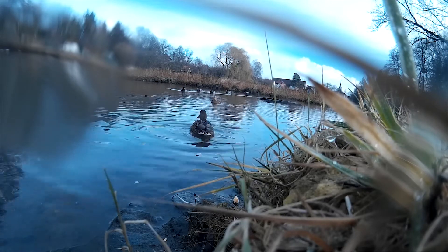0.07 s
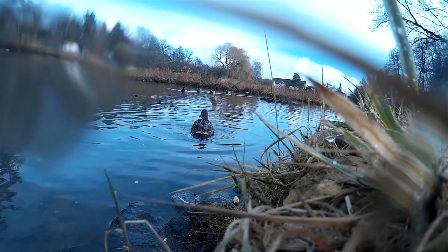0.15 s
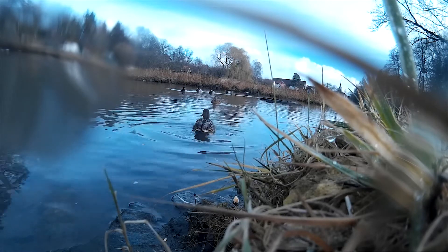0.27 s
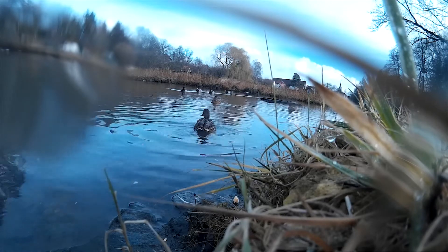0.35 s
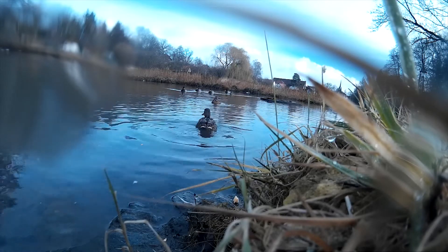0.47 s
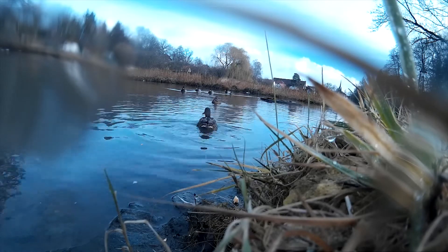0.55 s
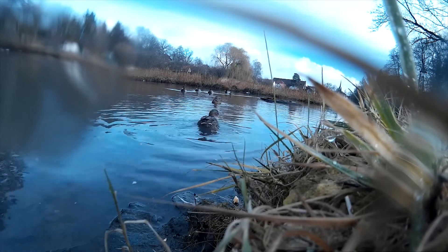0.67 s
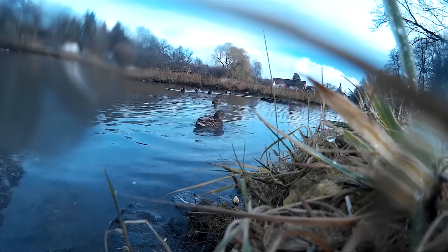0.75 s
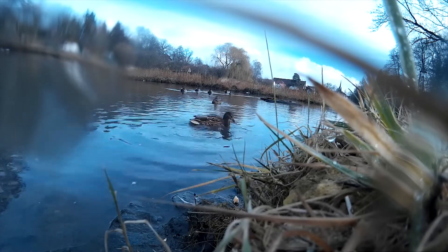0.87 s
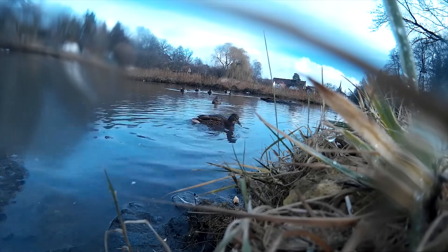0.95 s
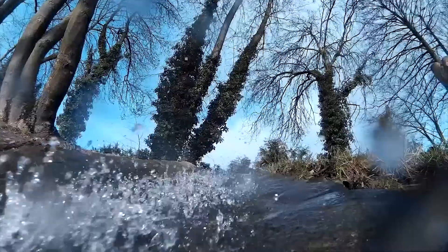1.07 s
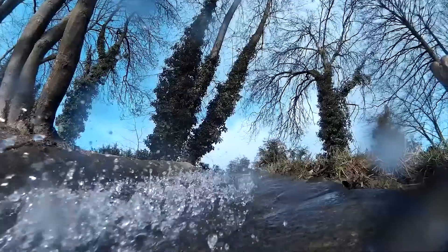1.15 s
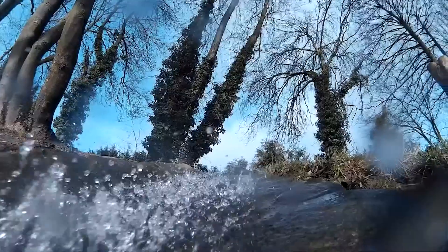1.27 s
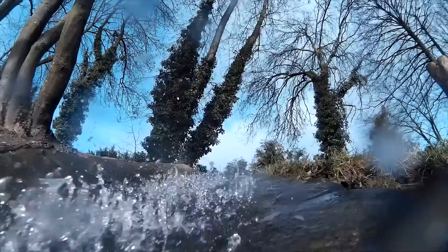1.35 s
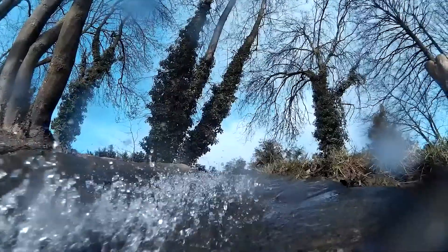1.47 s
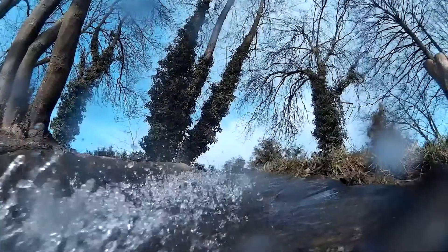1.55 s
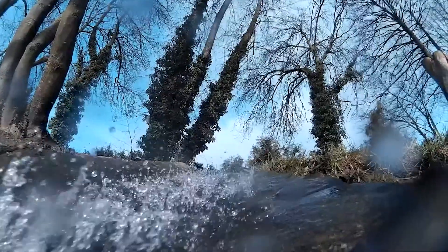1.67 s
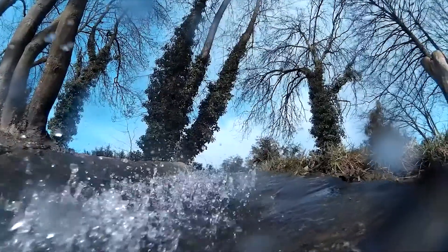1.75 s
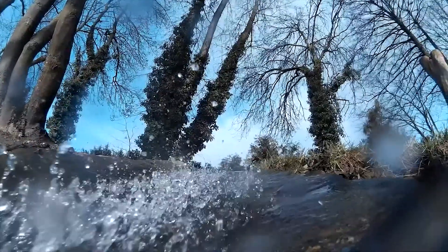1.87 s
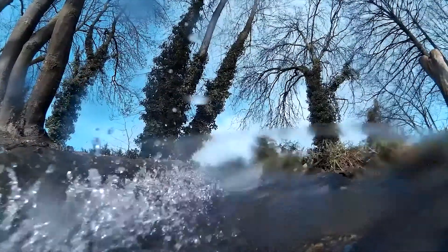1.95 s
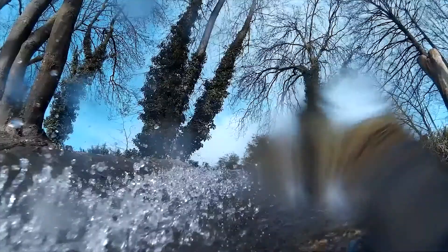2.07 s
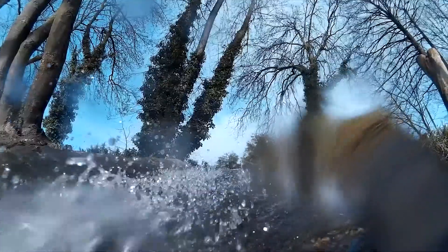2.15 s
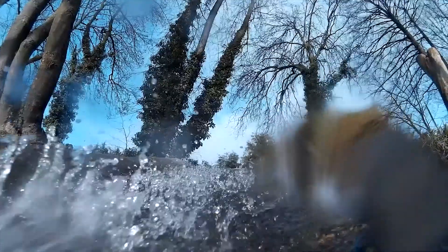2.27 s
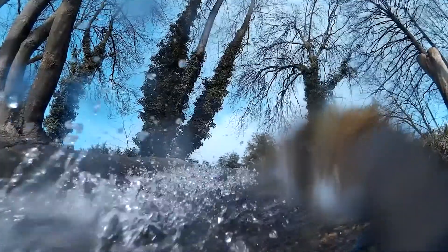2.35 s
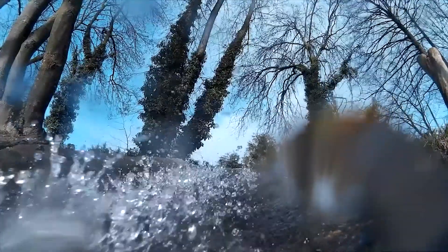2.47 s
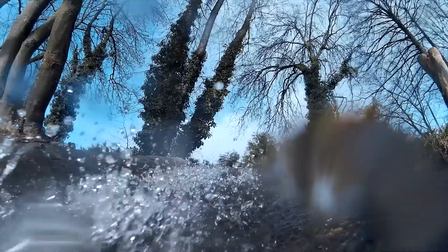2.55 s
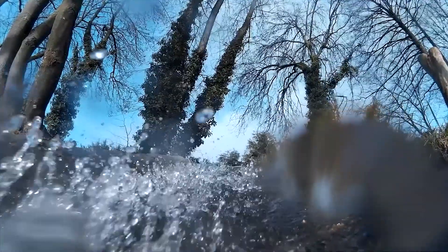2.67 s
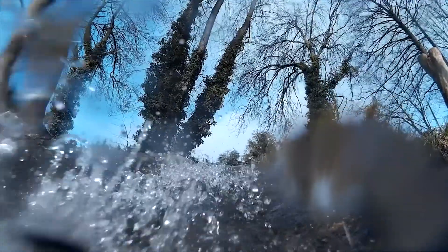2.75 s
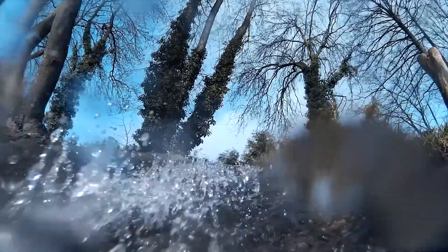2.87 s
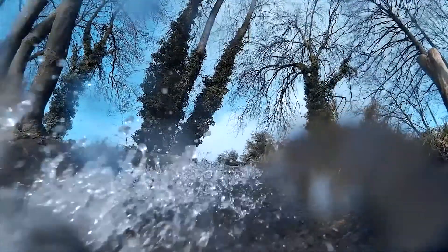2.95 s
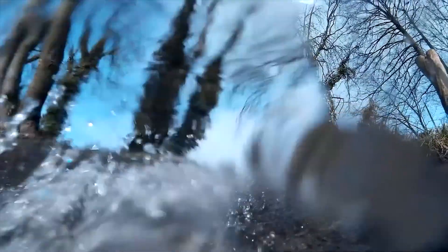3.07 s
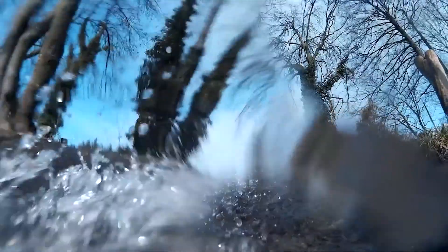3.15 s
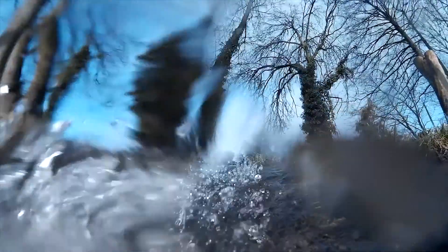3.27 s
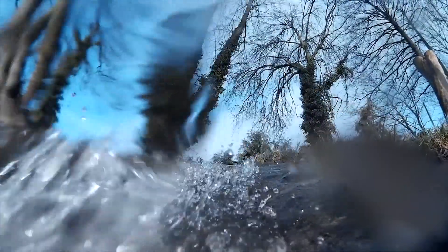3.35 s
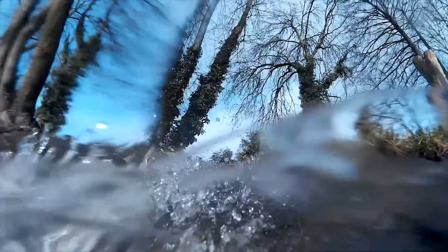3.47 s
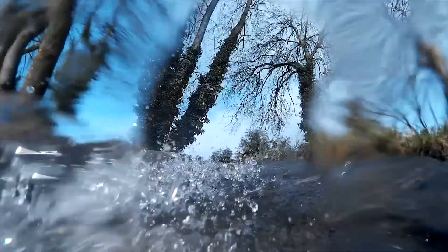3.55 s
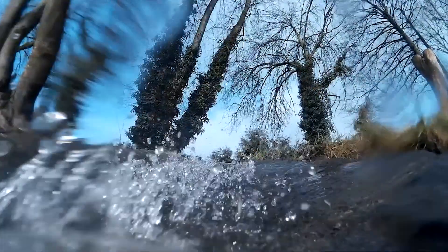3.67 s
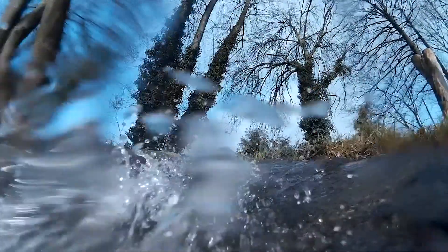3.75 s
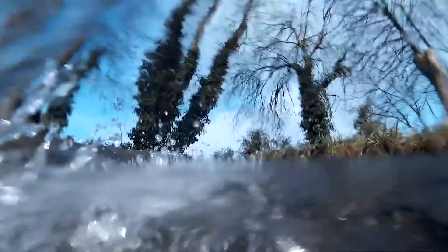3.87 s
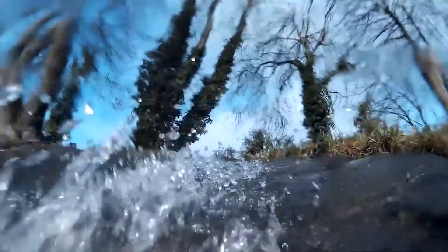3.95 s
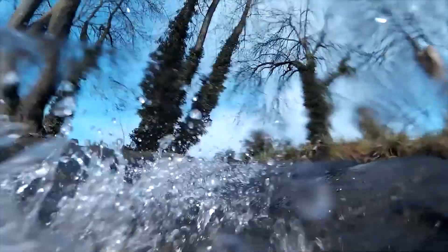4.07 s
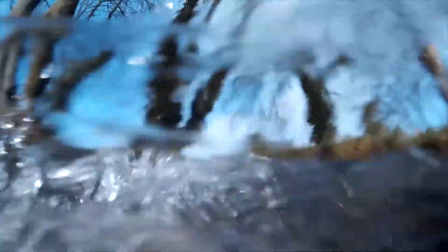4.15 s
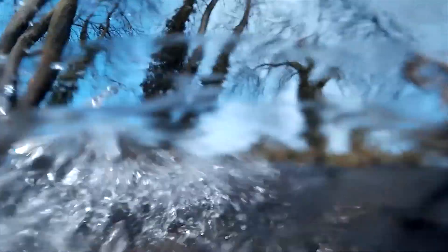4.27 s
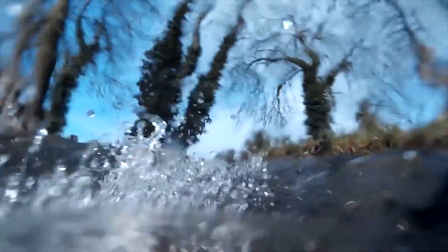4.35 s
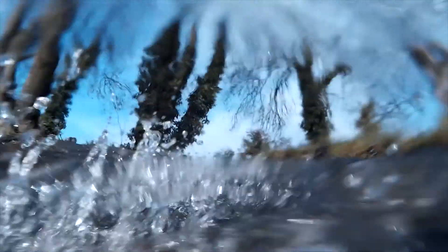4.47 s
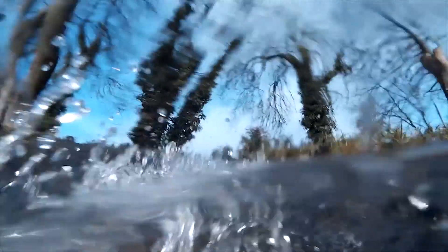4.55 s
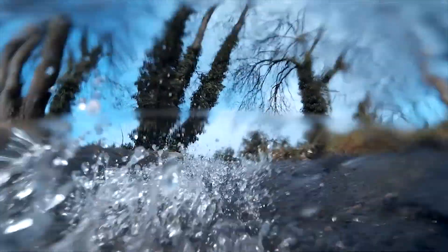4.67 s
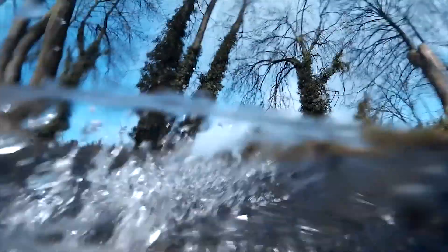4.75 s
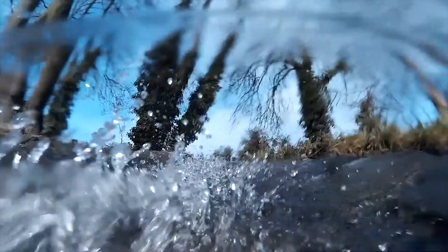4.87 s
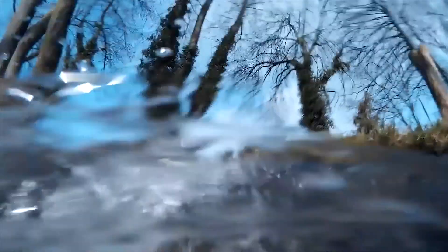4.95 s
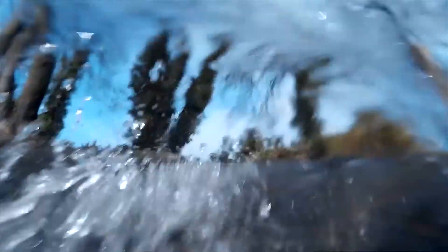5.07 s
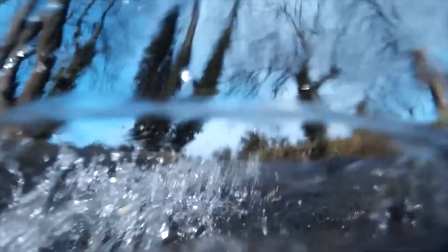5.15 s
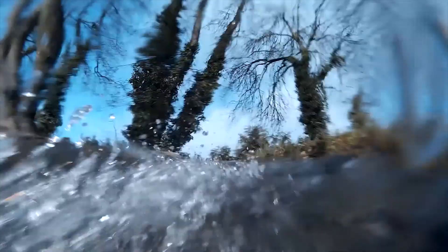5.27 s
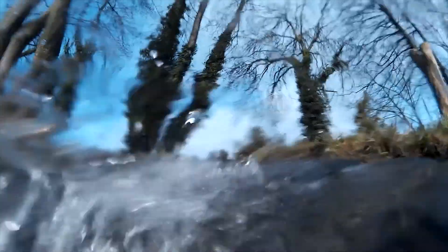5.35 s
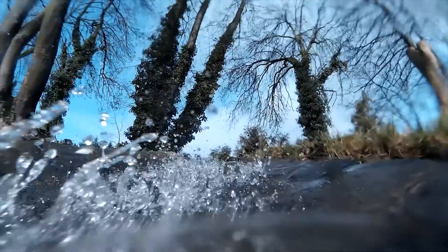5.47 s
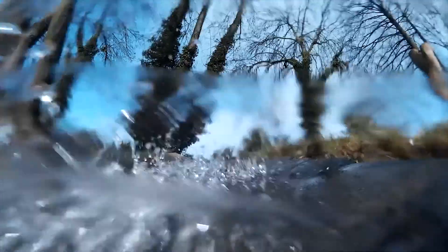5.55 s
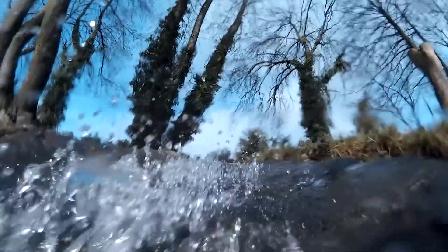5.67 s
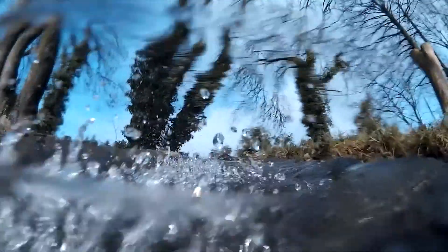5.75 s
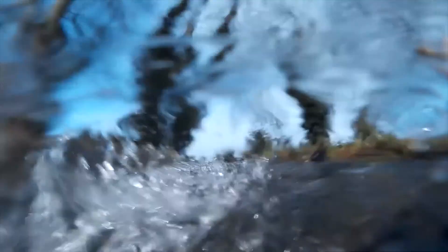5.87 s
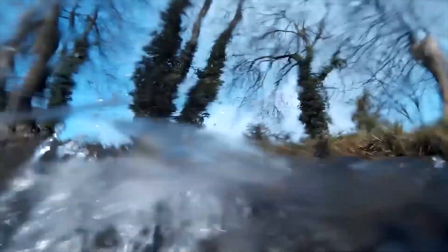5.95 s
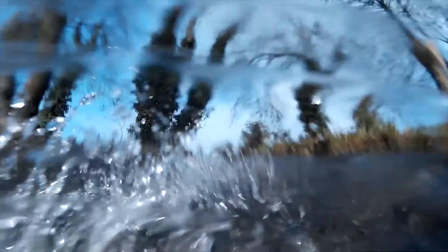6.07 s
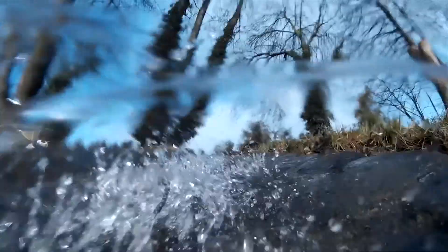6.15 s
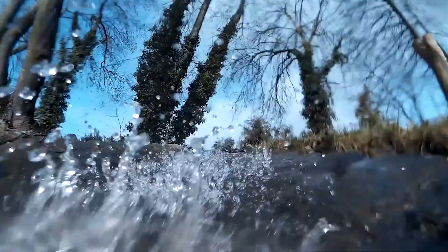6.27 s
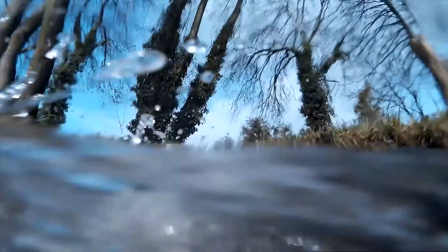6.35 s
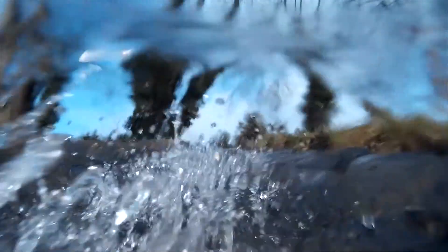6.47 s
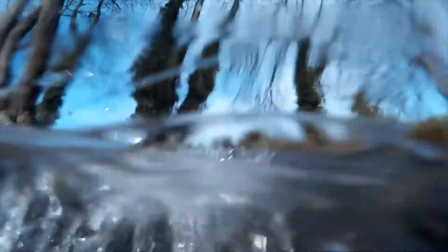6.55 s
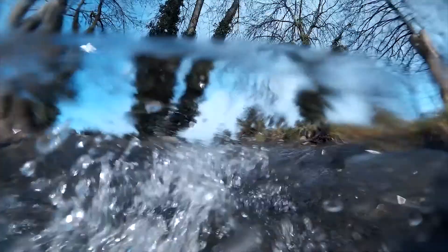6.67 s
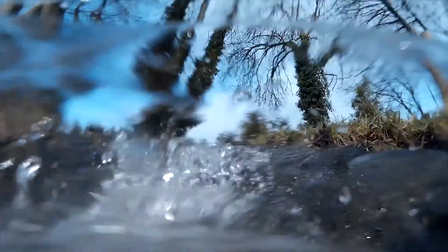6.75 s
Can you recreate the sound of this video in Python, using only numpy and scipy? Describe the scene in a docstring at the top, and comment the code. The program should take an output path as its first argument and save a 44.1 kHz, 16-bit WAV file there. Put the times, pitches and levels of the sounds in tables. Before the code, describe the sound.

From 0 to 1.05 seconds there is only very faint, steady microphone hiss. Then water enters quietly: fine random drops, foam fizz and a few weak taps on a sealed case. A clear slap lands at about 1.9, smaller ones at 2.1 and 2.45. From 2.65 the blows grow, and between 2.9 and 3.5 they crowd together, hollow and knocking, with pitched bubble plops. From 3.5 to 4.6 the churn is dense and loud, gurgling and splattering directly on the case. It eases a little around 5.2 to 5.6, though hard slaps continue at 5.08, 5.48, 5.72, 5.94 and 6.0. More slaps and plops follow, with a strong bubbly plop near 6.8, cut off as splashing continues. The sound is close, dry and boxy, with a short mid-range ring, muted treble, slight high grain and flattened peaks.

```python
"""Pond water on a sealed camera case

After a second of faint hiss, water churns: random drops with foam bubbles, gurgles and grain near 8 kHz.
Slaps are noise bursts, plops are splashes with a sine bubble; the churn swells and ebbs on its own course.
Drops, foam and blows excite the boxy ring of the case; the hardest hits are flattened by the microphone."""
import sys
import numpy as np
from scipy import signal
from scipy.fft import rfft, irfft
from scipy.io import wavfile
from scipy.ndimage import uniform_filter1d

SR = 44100
rng = np.random.default_rng(int(sys.argv[2]) if len(sys.argv) > 2 else 0)


def master(y):
    """Save y as 16-bit WAV."""
    cut = np.clip(np.atleast_2d(y).T, -1, 1)
    pcm = np.round(cut * 32767)  # scale
    wavfile.write(sys.argv[1], SR, pcm.astype(np.int16))


N = 300275
TIME = np.arange(N) / SR
WATER_START_S = 1.053


def undb(db):
    """Decibels to gain."""
    return 10 ** (np.asarray(db) / 20)


def unit(x):
    """Scale to rms 1."""
    return x / np.sqrt(np.mean(x ** 2) + 1e-20)


def spectrum_db(points, hz):
    """Join (Hz, dB) points on a log-frequency axis."""
    point_hz, point_db = np.transpose(points)
    return np.interp(np.log(hz + 1), np.log(point_hz), point_db)


def band(x, lo_hz, hi_hz):
    """Causal band-pass."""
    sos = signal.butter(N=3, Wn=[lo_hz, hi_hz], btype="band", fs=SR, output="sos")
    return signal.sosfilt(sos, x)


def lowpass(x, hz):
    """Steep elliptic cut of the top."""
    sos = signal.ellip(10, 0.2, 75, hz, fs=SR, output="sos")
    return signal.sosfilt(sos, x)


def add(track, start_s, sound):
    """Mix a sound in at a time, cut at the end of the track."""
    i = int(start_s * SR)
    part = sound[:max(len(track) - i, 0)]
    track[i:i + len(part)] += part


def walk(rate_hz):
    """Smooth random wander of rms 1."""
    hold = int(SR / rate_hz)
    steps = np.repeat(rng.standard_normal(N // hold + 1), hold)
    return unit(uniform_filter1d(steps, hold)[:N])


# Each row: frequency in Hz, noise density in dB re an arbitrary level.
HISS_SPECTRUM = [(20, -4), (85, -8), (165, -11), (300, -15), (1200, -22.5), (5000, -27.5), (15000, -27.5)]


def hiss(level_db=-68.5):
    """Microphone self-noise: steady shaped noise, present only before the water begins."""
    hz = np.arange(N // 2 + 1) * SR / N
    spectrum = rfft(rng.standard_normal(N)) * undb(spectrum_db(HISS_SPECTRUM, hz))
    noise = irfft(spectrum, N)
    return unit(noise) * undb(level_db) * (TIME < WATER_START_S)


# Broad response of the sealed case. Each row: frequency in Hz, gain in dB.
CASE_RESPONSE = [(25, -4), (140, -3.5), (220, 4), (350, 4), (560, -4), (1030, -7.5), (1650, -5), (2200, 1),
                 (2500, -11.5), (3150, -12.5), (3800, -4), (5500, -13.5), (6700, -31), (8200, -35.5)]
BOX_HZ, TOP_EDGE_HZ = 776, 7950
# Case resonances, then a narrow peak at the recorder's upper band edge.
# Each row: centre in Hz, width in Hz, lift in dB.
RESPONSE_PEAKS = [(BOX_HZ, 58, 26.7), (1330, 280, 9.36), (1825, 77, 8.3), (2695, 180, 9.6),
                  (5400, 140, 0.97), (5900, 89, 0.96), (TOP_EDGE_HZ, 210, 13.8)]


def case_ring(size=4096):
    """One tap on the case as recorded: a minimum-phase (causal) response whose peaks ring briefly."""
    hz = np.arange(size // 2 + 1) * SR / size
    gain = undb(spectrum_db(CASE_RESPONSE, hz))
    for centre_hz, width_hz, lift_db in RESPONSE_PEAKS:
        detuning = 2 * (hz - centre_hz) / width_hz
        gain = gain * np.sqrt(1 + (undb(lift_db) ** 2 - 1) / (1 + detuning ** 2))
    # fold the cepstrum to make the response causal
    cepstrum = irfft(np.log(gain))
    cepstrum[1:size // 2] *= 2
    cepstrum[size // 2 + 1:] = 0
    return irfft(np.exp(rfft(cepstrum)))


def drops(rate_hz, scatter_db, biggest):
    """Random taps of either sign: many small ones, a few large."""
    size = undb(scatter_db * np.minimum(rng.exponential(size=N), biggest))
    lands = rng.random(N) < rate_hz / SR
    return unit(lands * size * rng.choice([-1, 1], N))


def bubble(hz, t60_s, attack_s=0.00034):
    """A trapped air pocket: a sine decaying 60 dB, rising slightly in pitch as it nears the surface."""
    t = TIME[:int(max(t60_s, 0.002) * SR)]
    age = t / t[-1]
    phase = 2 * np.pi * hz * t * (1 + 0.03 * age)
    attack = 1 - np.exp(-t / attack_s)
    return np.sin(phase) * np.exp(-np.log(1000) * age) * attack


def fizz(count, low_hz, high_hz, longest_t60_s, scatter_db, biggest, small_db):
    """Bubbles of random size and time; small ones are higher, die sooner and gain up to small_db."""
    out = np.zeros(N)
    for when, small, chance in rng.random((count, 3)):
        hz = low_hz * (high_hz / low_hz) ** small
        db = scatter_db * min(-np.log(chance), biggest) + small_db * small
        t60_s = longest_t60_s * np.sqrt(low_hz / hz)
        add(out, when * N / SR, undb(db) * bubble(hz, t60_s))
    return unit(out)


def gurgle(level_db, gurgle_db=-10):
    """Larger, lower bubbles ring out of the churn."""
    bubbles = fizz(count=420, low_hz=1050, high_hz=2700, longest_t60_s=0.024,
                   scatter_db=5, biggest=2.2, small_db=0)
    return bubbles * undb(level_db + gurgle_db)


def top_edge_grain(level_db, wash, far_db=-31, close_db=-24):
    """Narrow, grainy band near 8 kHz at the recorder's upper limit: filtered ticks, rising with the churn."""
    ticks = drops(rate_hz=160, scatter_db=6, biggest=2.8)
    grain = unit(band(ticks, 7600, 8350))
    return grain * undb(level_db + far_db + wash * (close_db - far_db))


# Edges in Hz of five ranges: thud, knock, clack, spray and snap.
RANGE_EDGES_HZ = [20, 570, 1050, 2800, 6300, 10000]
# How hard the water churns. Each row: time in seconds, relative level in dB.
CHURN_LEVEL = [(1.07, -60), (1.63, -59), (1.79, -53.5), (2.19, -56.5), (2.43, -50), (2.59, -52.5),
               (2.99, -48.5), (4.11, -39), (4.43, -43), (4.51, -35.5), (4.67, -39.5), (4.91, -39.5),
               (5.15, -46.5), (5.47, -47), (5.63, -51.5), (5.71, -42.5), (6.11, -46.5), (6.8, -42.5)]
# One row per range: offset in dB out on the pond, offset in dB when washing over the case.
CHURN_OFFSETS = [(-10, -7.5), (4, 0.5), (-3, -6), (-11.5, -13.5), (-20, -23.5)]
# Churn levels at which water starts to run over the case and fully covers it.
WASH_BEGINS_DB, WASH_COVERS_DB = -54, -44.5


def churn(ring, near_db=3, splatter=0.19, splatter_decay_s=0.0014):
    """Fine patter and foam nearby, joined by coarser splattering drops on the case, ring the case."""
    level_db = np.interp(TIME, *np.transpose(CHURN_LEVEL))
    wash = np.clip((level_db - WASH_BEGINS_DB) / (WASH_COVERS_DB - WASH_BEGINS_DB), 0, 1)
    far = drops(rate_hz=1100, scatter_db=4.5, biggest=2.6)
    taps = drops(rate_hz=340, scatter_db=5.5, biggest=2.4)
    # each near drop bursts into a brief splatter
    decay = np.exp(-1 / (splatter_decay_s * SR))
    burst = signal.lfilter([1], [1, -decay], np.abs(taps))
    near = unit(taps + splatter * burst * rng.standard_normal(N))
    foam = fizz(count=4200, low_hz=1100, high_hz=7500, longest_t60_s=0.015,
                scatter_db=5, biggest=3, small_db=15)
    force = far * (1 - 0.5 * wash)
    force = force + wash * undb(near_db) * near
    force = force + (0.4 + 0.45 * wash) * foam
    # the water arrives in clumps
    force = force * undb((1.6 + 1.3 * wash) * walk(rate_hz=90))
    sound = signal.fftconvolve(force, ring)[:N]
    patter = np.zeros(N)
    for lo_hz, hi_hz, (far_db, close_db) in zip(RANGE_EDGES_HZ, RANGE_EDGES_HZ[1:], CHURN_OFFSETS):
        range_db = level_db + far_db + wash * (close_db - far_db)
        patter += unit(band(sound, lo_hz, hi_hz)) * undb(range_db)
    return (patter + gurgle(level_db) + top_edge_grain(level_db, wash)) * (TIME > WATER_START_S)


def pressed(db, hard_db=-32, push=0.77):
    """Blows above hard_db land squarely on the microphone wall and gain push dB per dB."""
    return db + push * max(db - hard_db, 0)


# Knock, clack, spray and snap of an average blow. Each row: centre in Hz, relative level in dB.
AVERAGE_BLOW = [(775, -6.5), (1700, -4.5), (4000, -12.5), (7500, -19.5)]
PIVOT_HZ = 1620


def colour(brightness_db_per_octave, thud_db):
    """Relative dB of thud, knock, clack, spray and snap; brightness tilts the last four about a pivot."""
    hz, db = np.transpose(AVERAGE_BLOW)
    return np.r_[thud_db, db + brightness_db_per_octave * np.log2(hz / PIVOT_HZ)]


def impact(rings, bands_db, early_s=0.004):
    """Leading drops, a blow and the splatter after it ring the case, with a separate level per range."""
    count, size = rings.shape
    t = TIME[:size] - early_s
    before = 0.096 * np.exp(-np.abs(t) / 0.0015)
    # a gentle lump dribbles on, a hard one bursts all at once
    dribble = 0.024 / (1 + undb(max(bands_db) + 43) ** 2)
    after = 0.21 * np.exp(-np.abs(t) / 0.0021) + dribble * np.exp(-np.abs(t) / 0.015)
    # large and small droplets land in separate bunches just under a millisecond long
    bunch_db = 5 * np.repeat(rng.uniform(-1.7, 1.7, (count, size // 32)), 32, axis=1)
    envelope = undb(bunch_db) * np.where(t < 0, before, after)
    force = rng.standard_normal((count, size)) * envelope
    force[:, np.argmin(np.abs(t))] += 1  # the blow
    parts = signal.fftconvolve(rings, force, axes=1)[:, :size]
    return sum(undb(db) * unit(part) for part, db in zip(parts, bands_db))


def shove(db, length_s=0.0048):
    """A heavy lump flexes the wall in and out once: one windowed sine cycle."""
    t = TIME[:int(length_s * SR)]
    return undb(db) * np.sin(2 * np.pi * t / t[-1]) * np.hanning(len(t))


# Cycles to a 60 dB decay, for the bubbles of slaps and plops.
BUBBLE_CYCLES = 31.3
# Lumps of water slapping the case. Each row: time in seconds, relative level in dB,
# brightness in dB per octave, thud in dB relative to the level.
SLAP_EVENTS = [(1.0816, -51.5, -11, -3), (1.1584, -48.0, -2.5, -14), (1.3513, -53.5, 0, -6),
               (1.5391, -56, 1, -1), (1.8885, -33.5, -2, -12.5), (1.895, -41.5, -1, -10),
               (2.1032, -42.5, -2, -15), (2.1951, -51.5, 0, -1.5), (2.3516, -55, 3.5, 3.5),
               (2.4612, -39, 1.5, -12.0), (2.5331, -46, 2.0, -1), (2.651, -33, 0.5, -8),
               (2.7746, -41.5, -6, -10.0), (2.7999, -36.5, -2, -5), (2.9267, -40.0, -6.5, -8),
               (2.9411, -31.5, 3.5, -11.0), (2.9696, -29.5, 1.5, -7.5), (2.9757, -28.5, -3.5, -17.5),
               (2.991, -34.5, -1, -9), (3.0473, -38.5, 3, -5), (3.063, -35.5, 2, -9),
               (3.0835, -31.5, -6.5, -19), (3.1495, -35, -8.5, -7.5), (3.1878, -37.0, 1.0, -13),
               (3.2015, -33.5, -2.5, -15), (3.2074, -30.5, 3.5, -16), (3.241, -37.0, 0.0, -24),
               (3.2968, -29.5, -1, -15), (3.3487, -27.5, 3.5, -15), (3.3944, -38, 1, -8),
               (3.4109, -26, -6.5, -5), (3.436, -42, 6, -19), (3.4503, -33.5, 1, -16),
               (3.5415, -31, 1.5, -8), (3.5663, -32, -6.5, -16.0), (3.5956, -27.5, -3.0, -13.5),
               (3.6829, -27.5, 1.5, -17), (3.7359, -23.5, 1, -22), (3.785, -31, 2.0, -14.5),
               (3.876, -32.5, -1.0, -16), (3.9528, -30.5, 4.5, -17), (4.0038, -31, 0.5, -18.5),
               (4.0544, -31.5, 1, -11.5), (4.0998, -31.5, -1, -12.5), (4.1153, -30, -1, -13.5),
               (4.129, -31.5, 2.5, -6), (4.1443, -30, -1, -11.5), (4.2167, -30, -6, -9),
               (4.2291, -28.5, -1.5, -12.5), (4.2447, -29, 0.5, -15.0), (4.2545, -28.5, -1, -21),
               (4.344, -33.5, -1.5, -20), (4.3674, -30.5, 0.0, -9.5), (4.5127, -29.5, -3.5, -23.5),
               (4.5811, -29.5, 0.5, -17), (4.754, -38, 2, -3), (4.8062, -29.5, -1, -2.5),
               (4.8152, -28.0, 0.5, -15), (4.8342, -29.5, -3, -11), (4.8649, -38, 8.5, -4),
               (4.9028, -36.5, -8.5, -17), (4.9468, -38, 2.5, 6), (4.9805, -31, 0, -11),
               (5.04, -32.5, -3, -10), (5.0674, -28.5, 0, -13), (5.078, -25, -3, -11),
               (5.2589, -35, -1.5, -8.5), (5.2823, -32.5, -4.5, -11.5), (5.3597, -46.5, 6, 8),
               (5.413, -36, 2, -1.5), (5.4266, -30.5, -7.5, -20.0), (5.4412, -38, 0, -5),
               (5.4752, -27.5, -2.5, -10), (5.68, -35.5, -2, -16), (5.7171, -26, -1, -9),
               (5.7786, -38, -5.5, -6), (5.7861, -46, 12, 0), (5.9375, -25.5, 1.5, -9.5),
               (5.9738, -37.5, 0.5, -3), (5.9941, -25, -2.0, -9), (6.044, -35.5, 2.0, -2),
               (6.0692, -34, -4, -4), (6.1789, -37.5, -1, -4), (6.2347, -35.5, -9.5, -6.5),
               (6.287, -28, 0.5, -5.5), (6.3793, -32, 0, -12), (6.4724, -33.5, -6, -18),
               (6.4824, -32.5, 2.0, -4.5), (6.5231, -33, -3.0, -3.5), (6.5575, -38.5, -1, -4),
               (6.6609, -32, -5, -9.5), (6.7092, -30, -2, -15), (6.7173, -27, 1.0, -16),
               (6.7266, -34.5, -3, -8.5), (6.7688, -37.5, 7, 0.5)]


def slaps(rings, slap_db=-9.0, early_s=0.0037, heavy_db=-28, shove_db=8, pop_db=2, pop_hz=2300):
    """Lumps of water hit the case; heavy ones flex its wall, and each pops two tiny bubbles."""
    out = np.zeros(N)
    for time_s, db, brightness, thud_db in SLAP_EVENTS:
        bands_db = pressed(db) + colour(brightness, thud_db)
        add(out, time_s - early_s, impact(rings, bands_db + slap_db))
        if db > heavy_db:
            add(out, time_s, shove(db + thud_db + shove_db))
        spray_db = bands_db[3]
        for small, late in rng.random((2, 2)):
            hz = pop_hz * 3 ** small
            gain = 2 / (1 + late) * undb(spray_db + pop_db)
            add(out, time_s + 0.008 * late, gain * bubble(hz, BUBBLE_CYCLES / hz))
    return out


# Splashes that trap a bubble. Each row: time in seconds, relative bubble level in dB,
# starting bubble pitch in Hz, relative splash level in dB.
PLOP_EVENTS = [(2.815, -32.5, 3730, -31.5), (2.834, -47, 2180, -46), (3.155, -47, 1470, -36),
               (3.269, -31, 1394, -34.5), (3.487, -29.5, 1826, -30.5), (3.607, -29.5, 1830, -47),
               (3.653, -38, 1280, -41), (3.814, -35, 1910, -37), (3.838, -30, 2070, -27.5),
               (3.968, -30, 1440, -28), (3.982, -29.5, 1850, -28.5), (4.301, -40.5, 3630, -60),
               (4.377, -34, 1950, -37), (4.394, -31, 2080, -30), (4.44, -31, 1920, -30),
               (4.872, -33.5, 3900, -28.5), (5.058, -27.5, 2000, -27), (5.29, -43, 1540, -55),
               (5.549, -31, 2730, -29.5), (5.735, -31, 2010, -28), (5.741, -32, 4400, -29.5),
               (6.156, -30, 2200, -32), (6.496, -30, 2160, -25), (6.565, -39.5, 3900, -35.5),
               (6.792, -24, 1784, -25.5)]


def plops(rings, splash_db=-11, brightness=1.0, thud_db=-11, bubble_db=14.5,
          early_s=0.001632, pinch_s=0.0027):
    """A splash pinches off a bubble against the case; small bubbles start stronger and die sooner."""
    out = np.zeros(N)
    for time_s, ring_db, hz, db in PLOP_EVENTS:
        bands_db = pressed(db) + splash_db + colour(brightness, thud_db)
        add(out, time_s - early_s, impact(rings, bands_db))
        gain = undb(pressed(ring_db) + bubble_db) * np.sqrt(hz / PIVOT_HZ)
        add(out, time_s + pinch_s, gain * bubble(hz, BUBBLE_CYCLES / hz))
    return out


def scene(damping_s=0.022):
    """All the water; a lump lying on the wall damps the ring of slaps and plops."""
    ring = case_ring()
    damped = ring * np.exp(-TIME[:len(ring)] / damping_s)
    ranges = zip(RANGE_EDGES_HZ, RANGE_EDGES_HZ[1:])
    rings = np.array([band(damped, lo_hz, hi_hz) for lo_hz, hi_hz in ranges])
    return (churn(ring) + slaps(rings) + plops(rings))[None]


def record(dry, ceiling=0.17, water_top_hz=8150, top_hz=15700):
    """The microphone flattens peaks near the ceiling and cuts the water's treble; its hiss reaches higher."""
    clipped = dry / (1 + (dry / ceiling) ** 6) ** (1 / 6)
    water = lowpass(clipped, water_top_hz)
    return lowpass(water + hiss(), top_hz)


dry = scene()
out = record(dry)
master(out)
```